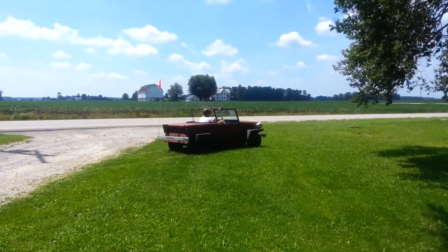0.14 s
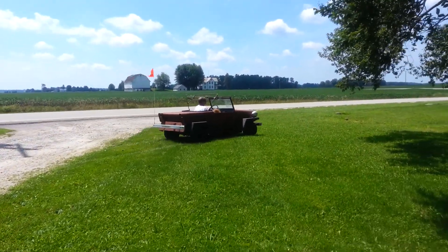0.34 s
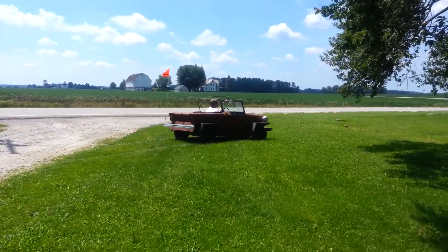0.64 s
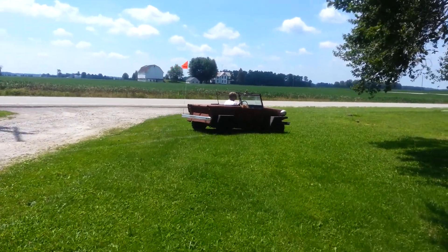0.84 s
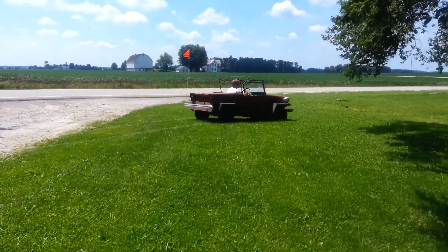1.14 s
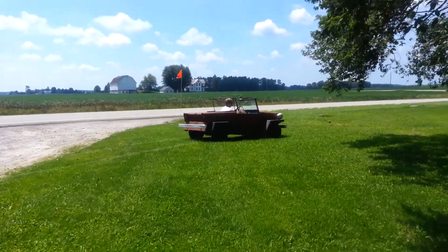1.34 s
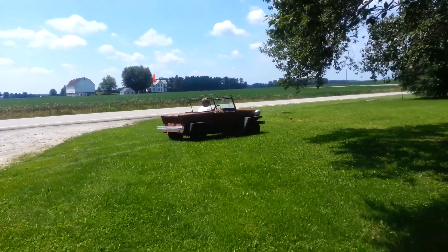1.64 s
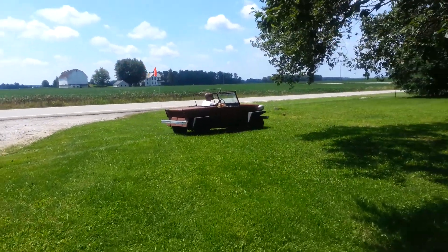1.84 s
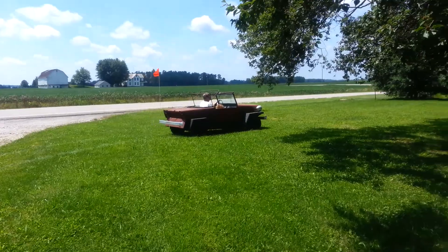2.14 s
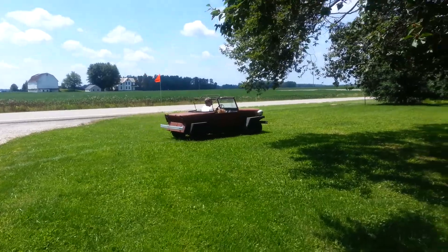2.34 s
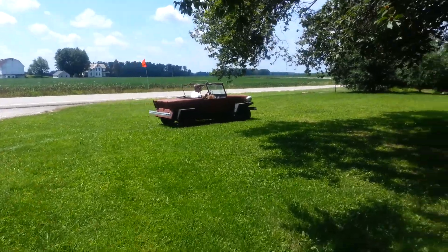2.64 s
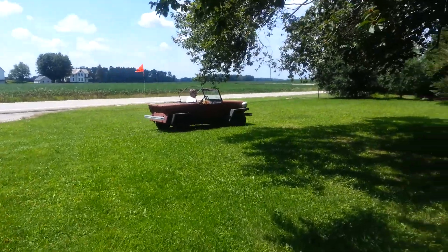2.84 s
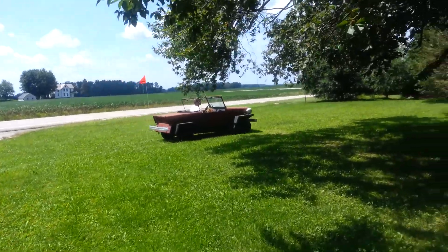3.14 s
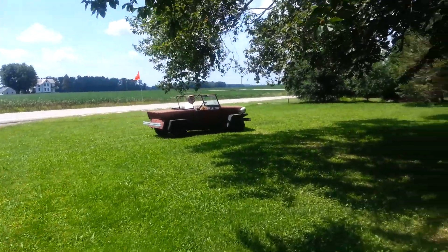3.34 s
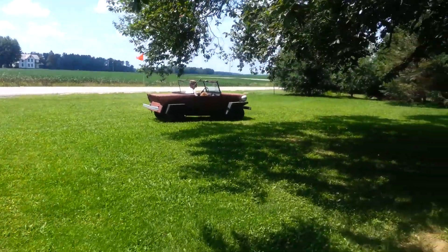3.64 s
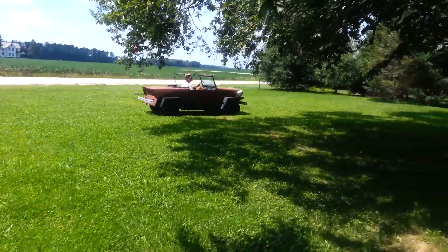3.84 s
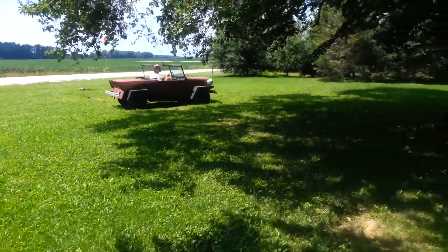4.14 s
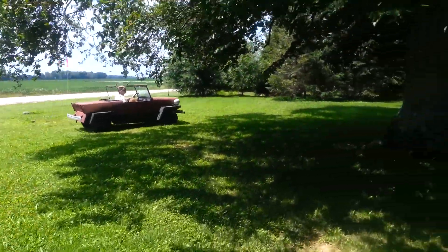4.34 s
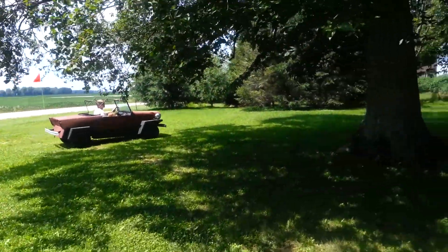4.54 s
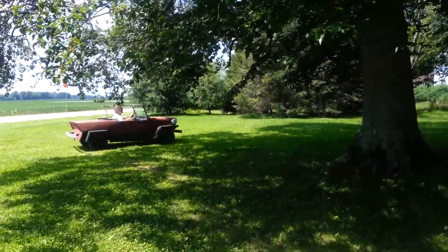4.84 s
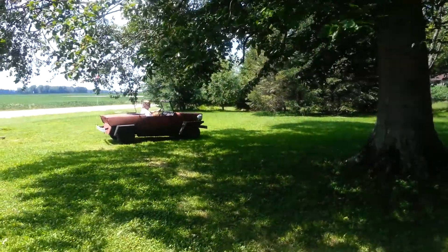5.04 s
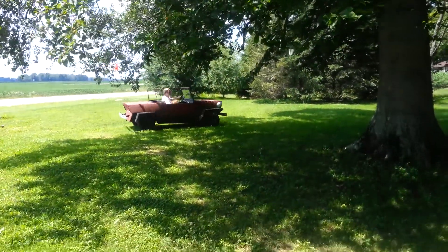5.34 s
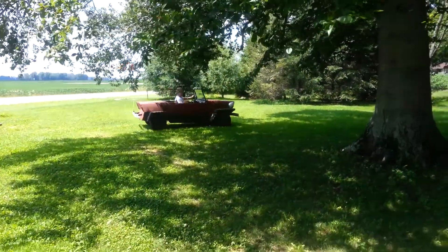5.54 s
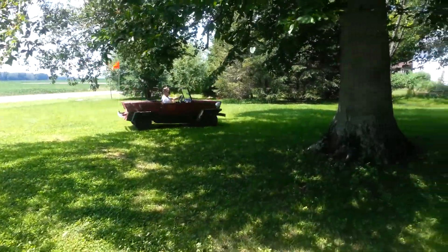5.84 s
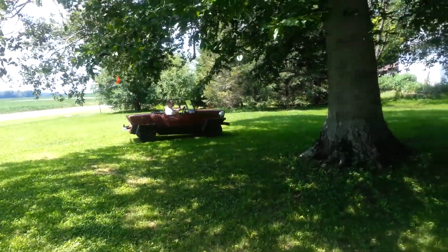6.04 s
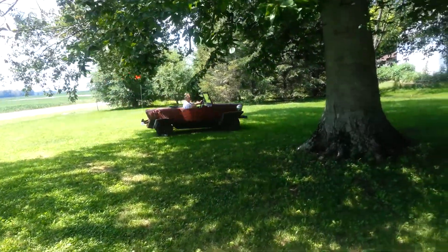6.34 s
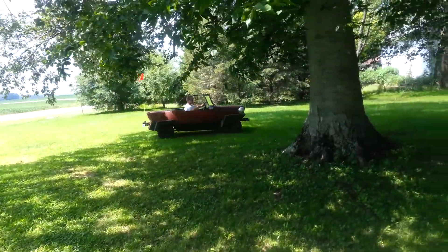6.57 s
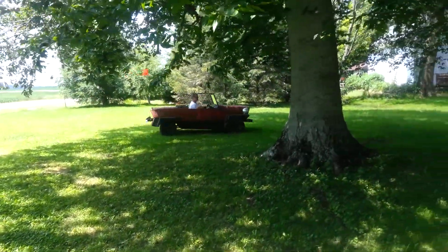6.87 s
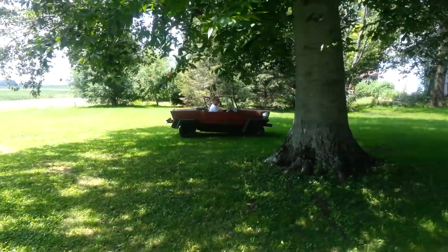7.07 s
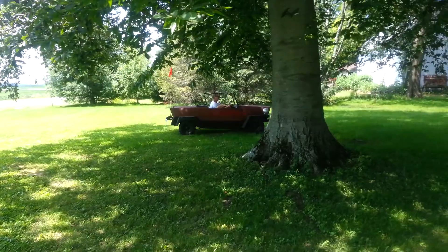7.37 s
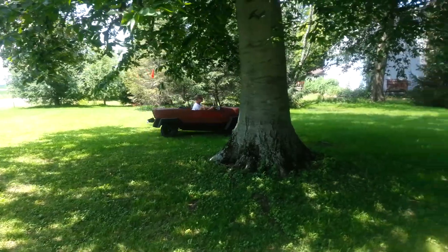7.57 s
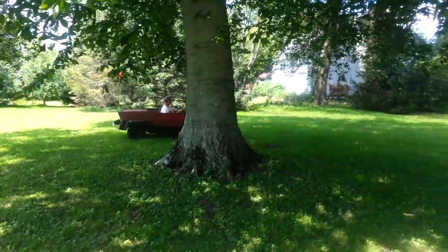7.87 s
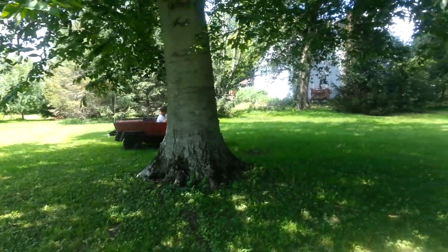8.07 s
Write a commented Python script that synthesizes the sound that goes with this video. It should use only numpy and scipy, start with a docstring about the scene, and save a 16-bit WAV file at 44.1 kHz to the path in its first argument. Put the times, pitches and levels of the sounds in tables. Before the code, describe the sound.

A small one-cylinder engine putts steadily, about thirteen low booming pops a second, as a little open car crosses a lawn outdoors.

```python
"""A one-cylinder four-stroke engine putts in a little car crossing a lawn, some ten metres from a phone.
Each firing booms in the exhaust until the valve shuts; its crests ring body panels and silencer.
Each boom shakes a loose metal part, a few bumps knock the chassis, and tyres rumble on the grass.
The tree line returns a faint echo; air and microphone hiss, two thin tones sound, the camera ticks."""
import sys
import numpy as np
from scipy import signal
from scipy.fft import rfft, irfft
from scipy.io import wavfile
from scipy.ndimage import uniform_filter1d

SR = 44100
rng = np.random.default_rng(int(sys.argv[2]) if len(sys.argv) > 2 else 0)


def wrap_up_sound(samples):
    """Save the sound to the file named by the first command line argument, as 16-bit audio."""
    columns = np.atleast_2d(samples).T
    # keep every value between -1 and 1, then stretch to whole-number steps
    tamed = np.clip(columns, -1, 1)
    steps = np.round(tamed * 32767).astype(np.int16)
    wavfile.write(sys.argv[1], SR, steps)


N = 361905


def undb(db):
    """Decibels to amplitude ratio."""
    return 10 ** (np.asarray(db) / 20)


def level(x, rms_db):
    """Scale a signal to an rms level."""
    return x * undb(rms_db) / np.sqrt(np.mean(x ** 2))


def band(x, hz, width_hz):
    """Two-pole resonance, gain 1 at the centre."""
    return signal.lfilter(*signal.iirpeak(hz, hz / width_hz, SR), x)


def noise():
    """White noise over the whole scene."""
    return rng.standard_normal(N)


def walk(rate_hz):
    """Random levels held 1 / rate_hz and slewed twice; spread about 0.5."""
    hold = int(SR / rate_hz)
    steps = np.repeat(rng.standard_normal(N // hold + 1), hold)
    slewed = uniform_filter1d(uniform_filter1d(steps, hold), hold)
    return 0.7 * slewed[:N]


def add(out, start_s, piece):
    """Mix a short sound in at its start time."""
    i = int(start_s * SR)
    lo, hi = max(i, 0), min(i + len(piece), N)
    if hi > lo:
        out[lo:hi] += piece[lo - i:hi - i]


# spectral shape of air, leaves and microphone: pitch_hz [Hz], density_db [dB per Hz, relative]
AIR_SHAPE = [(35, -22), (62, -1), (110, -4), (200, -2), (500, -26.5), (900, -11), (2000, -17), (3200, -17),
             (5800, -25), (8000, -22.5), (14300, -20.5)]
# thin steady tones: pitch_hz [Hz], rms_db [dB]
THIN_TONES = [(10201, -81), (13502, -85)]
AIR_RMS_DB = -52  # before the flicker


def air():
    """Smooth coloured hiss that flickers a little, and two thin tones."""
    shape_hz, density_db = np.transpose(AIR_SHAPE)
    bin_hz = np.maximum(np.arange(N // 2 + 1) * SR / N, 1)
    gain_db = np.interp(np.log(bin_hz), np.log(shape_hz), density_db)
    hiss = level(irfft(rfft(noise()) * undb(gain_db), N), AIR_RMS_DB)
    t = np.arange(N) / SR
    tones = sum(np.sqrt(2) * undb(rms_db) * np.sin(2 * np.pi * hz * t) for hz, rms_db in THIN_TONES)
    return hiss * undb(0.99 * walk(6)) + tones


# spells of ticking: middle_s [s], half_width_s [s], click_db [dB, before scatter and filtering]
TICK_SPELLS = [(.9, 0.58, -39), (1.83, 0.26, -36), (3.2, 0.35, -37), (5.5, 0.28, -36.5), (6.7, .35, -43)]
TICK_RATE_HZ, TICK_START_S, TICK_SCATTER_DB, TICK_WIDTH_S = 30, .030, 2.5, 0.00076


def ticks():
    """Camera ticks: tiny dull clicks on a strict clock, coming and going in patches."""
    at_s = np.arange(TICK_START_S, N / SR, 1 / TICK_RATE_HZ)
    scatter_db = TICK_SCATTER_DB * rng.standard_normal(len(at_s))
    swell = sum(undb(click_db) * np.exp(-((at_s - middle_s) / half_width_s) ** 2)
                for middle_s, half_width_s, click_db in TICK_SPELLS)
    clicks = np.zeros(N)
    clicks[(at_s * SR).astype(int)] = -undb(scatter_db) * swell
    # click width dulls the top
    dull = np.convolve(clicks, np.hanning(int(TICK_WIDTH_S * SR)), "same")
    return band(dull, 1150, 1200)


# chassis knocks: start_s [s], thud_db [dB peak], pitch_hz [Hz], crack_db [dB re thud]
BUMPS = [(1.687, -28, 232, -5), (3.04, -35, 230, -14), (4.943, -34, 227, -16), (5.017, -35, 230, -14)]


def bumps():
    """Chassis over bumps: a dull damped thud with a short broad crack on top."""
    out, age_s = np.zeros(N), np.arange(int(.06 * SR)) / SR
    for start_s, thud_db, pitch_hz, crack_db in BUMPS:
        swell = age_s / 0.0027 * np.exp(1 - age_s / 0.0029)
        thud = -np.sin(2 * np.pi * pitch_hz * age_s + 2) * swell
        grit = band(band(rng.standard_normal(len(age_s)), 750, 600), 750, 600)
        crack = band(grit * age_s * np.exp(-age_s / .002), 700, 500)
        add(out, start_s, undb(thud_db) * (thud + undb(crack_db) * crack / np.abs(crack).max()))
    return out


def tyres():
    """Tyres and springs over lumpy grass: uneven low noise, rms 1."""
    rumble = undb(2.16 * walk(20)) * band(band(noise(), 139, 133), 121, 295)
    return level(rumble, 0)


# engine speed, easing a little halfway: time_s [s], firing_rate_hz [firings per s]
SPEED = [(0, 13.1109), (4.3866, 13.1622), (5.7533, 12.9721), (8.21, 12.9826)]
FIRST_FIRING_S = .0202


def firings():
    """Integrate engine speed to a running firing count; return it and each firing time."""
    t = np.arange(N) / SR
    count = np.cumsum(np.interp(t, *np.transpose(SPEED))) / SR
    count += 1 - np.interp(FIRST_FIRING_S, t, count)
    at_s = np.interp(np.arange(1, count[-1]), count, t)
    # one firing before the start
    return count, np.r_[2 * at_s[0] - at_s[1], at_s]


# loudest rattles, replacing the one nearest in time: start_s [s], peak_db [dB], pitch_hz [Hz]
LOUD_RATTLES = [(0.0225, -43, 2800), (0.1767, -40, 2850), (0.4802, -39, 2900), (0.557, -41.5, 2840),
                (0.631, -45, 2820), (0.7852, -44.5, 2870), (1.0143, -44, 2920), (1.2415, -46, 2750),
                (2.2325, -45, 3180), (2.386, -45, 3020), (2.6886, -46, 3040), (2.766, -45.5, 3020),
                (2.9936, -40.5, 3100), (3.9065, -41.5, 3030), (4.4376, -46, 3060), (4.6646, -44, 3020)]
# the other, softer rattles
RATTLE_LAG_S, RATTLE_PITCH_HZ, RATTLE_SCATTER_HZ = .003, 2954, 169
RATTLE_PEAK_DB, RATTLE_SCATTER_DB, RATTLE_HIDDEN_DB = -49.5, 2, -21


def rattles(turn):
    """A loose metal part chatters some milliseconds as a boom starts; the body hides it in the turn."""
    out, age_s = np.zeros(N), np.arange(int(0.023 * SR)) / SR
    at_s = firings()[1][1:] + RATTLE_LAG_S
    chance = rng.standard_normal((len(at_s), 2)).T
    hidden_db = RATTLE_HIDDEN_DB * turn[(at_s * SR).astype(int)] ** 3
    soft_db = RATTLE_PEAK_DB + RATTLE_SCATTER_DB * chance[0] + hidden_db
    rows = np.transpose([at_s, soft_db, RATTLE_PITCH_HZ + RATTLE_SCATTER_HZ * chance[1]])
    for loud in LOUD_RATTLES:
        rows[np.abs(at_s - loud[0]).argmin()] = loud
    for start_s, peak_db, pitch_hz in rows:
        grit = rng.standard_normal(len(age_s)) * np.exp(-age_s / 0.0051)
        chatter = band(band(grit, pitch_hz, 280), pitch_hz, 410)
        add(out, start_s, undb(peak_db) * chatter / np.abs(chatter).max())
    return out


PIPE_SHUT_HZ, HOT_GAS_HZ, HOT_GAS_S = 161.5, 221, .0013
VALVE_DROP_HZ, VALVE_OPEN_S, SHUT_S = 64, .027, .0232
# from the flank: heard longer, higher, and fading with age
FLANK_LONGER_S, FLANK_HIGHER_HZ, FLANK_FADE_DB_PER_S = .0022, 8, -160


def boom(turn):
    """Phase, age and envelope of the exhaust resonance, counted from the latest firing."""
    count, at_s = firings()
    firing = count.astype(int)
    age_s = np.maximum(np.arange(N) / SR - at_s[firing], 0)
    chance = rng.standard_normal((firing[-1] + 1, 3))[firing].T
    # hot gas raises the pitch at first
    hot_cycles = HOT_GAS_HZ * HOT_GAS_S * (1 - np.exp(-age_s / HOT_GAS_S))
    # the open cylinder lengthens the pipe and lowers it; valve lift integrated over time
    open_s = np.minimum(age_s, VALVE_OPEN_S)
    lift_s = open_s / 2 - VALVE_OPEN_S * np.sin(2 * np.pi * open_s / VALVE_OPEN_S) / (4 * np.pi)
    cycles = PIPE_SHUT_HZ * age_s + hot_cycles - VALVE_DROP_HZ * lift_s
    cycles += FLANK_HIGHER_HZ * turn * age_s
    phase = 2 * np.pi * cycles * (1 + .003 * chance[0])
    # the valve shuts the boom off
    end_s = SHUT_S + FLANK_LONGER_S * turn + .0004 * chance[1]
    shut = 1 / (1 + np.exp((age_s - end_s) / .0011))
    shut *= undb(.5 * chance[2] + FLANK_FADE_DB_PER_S * turn * age_s)
    return phase, age_s, shut


# boom-shaken panels: pitch_hz [Hz], width_hz [Hz], behind_db [dB rms re boom], flank_db [dB rms re boom]
PANELS = [(184.7, 3.4, -33.5, -34), (209.7, 2.7, -55, -39), (227.4, 18, -49, -24), (274, 39, -35, -30.5),
          (313.5, 27, -35.5, -39), (408, 88, -33, -44.5), (524, 130, -51, -38.5), (688.6, 14.3, -36, -47.5),
          (928, 110, -45.5, -43.5), (1257, 36, -45.5, -57.5)]
SILENCER_HZ, SILENCER_WIDTH_HZ = 610, 50


def engine(turn, ring_db):
    """The boom, its steep crests in panels, silencer and tin, tail pipe gas and cooling air."""
    phase, age_s, shut = boom(turn)
    push = (1 - np.exp(-age_s / .0031)) * shut
    wave = -push * (np.sin(phase) + .07 * turn * np.cos(2 * phase))
    # crests steepen into short jolts, the first ones hardest
    smooth = shut * np.exp(-age_s / 0.021) * np.exp(30 * (-np.sin(phase) - 1))
    # turbulence makes them uneven in the upper range
    turbulence = level(band(band(noise(), 750, 700), 750, 900), -11)
    jolts = smooth * (1 + turbulence)
    panels = np.zeros(N)
    for pitch_hz, width_hz, behind_db, flank_db in PANELS:
        drive = smooth if pitch_hz < 350 else jolts
        panel = level(band(band(drive, pitch_hz, width_hz), pitch_hz, pitch_hz / 2), 0)
        panels += panel * undb(behind_db + (flank_db - behind_db) * turn)
    ring = level(band(band(jolts, SILENCER_HZ, SILENCER_WIDTH_HZ), SILENCER_HZ, 96), 0)
    # gas at the tail pipe
    puff = level(push * band(noise(), 530, 1230), -47)
    hiss = level(push * band(noise(), 7900, 9000), -52)
    # faint chatter of tin on every jolt, hidden as the car turns its flank
    chatter = band(band(noise(), 2500, 610), 2850, 860)
    tin = jolts * undb(4.7 * walk(13) - 11.4 * turn) * chatter
    tin = level(band(tin, 2950, 440), -50)
    # cooling air hisses past the fins on the flank
    fins = turn * undb(2 * walk(8)) * band(band(noise(), 2580, 250), 2600, 400)
    return wave + panels + undb(ring_db) * ring + puff + hiss + tin + level(fins, -54)


# drive across the lawn: time_s [s], boom_db [dB peak],
# turn [0 tail pipe faces the phone, 1 flank does], ring_db [silencer ring, dB rms re boom]
DRIVE = [(0, -20.5, 0.0078, -39), (1.7, -21, 0, -36.5), (2.8, -20.5, 0.085, -42), (3.5, -19, 0.35, -41),
         (4.1, -19, .54, -34.5), (4.7, -18, 0.68, -39), (5.3, -19.5, 0.77, -30.5),
         (6.9, -18.5, 0.91, -33.5), (8.21, -19.5, 0.97, -30)]
RUMBLE_BEHIND_DB, RUMBLE_FLANK_DB = -22.5, -24.5  # re boom
ECHO_S, ECHO_DB = .026, -25.5


def scene():
    """The car on the lawn with its tree-line echo, the small noises and the air."""
    time_s, *columns = np.transpose(DRIVE)
    boom_db, turn, ring_db = (np.interp(np.arange(N) / SR, time_s, column) for column in columns)
    turn = np.clip(turn, 0, 1)
    rumble_db = RUMBLE_BEHIND_DB + (RUMBLE_FLANK_DB - RUMBLE_BEHIND_DB) * turn
    car = undb(boom_db) * (engine(turn, ring_db) + undb(rumble_db) * tyres())
    # the tree line sends the car back a little later
    lag = int(ECHO_S * SR)
    car[lag:] += undb(ECHO_DB) * car[:-lag]
    return (car + rattles(turn) + bumps() + ticks() + air())[None]


BASS_CUT_HZ, TOP_HZ = 47, 14450


def record(dry):
    """The phone drops the deep bass and cuts the top steeply."""
    bass_cut = signal.butter(4, BASS_CUT_HZ, "high", fs=SR, output="sos")
    top_cut = signal.ellip(14, .2, 80, TOP_HZ, fs=SR, output="sos")
    return signal.sosfilt(top_cut, signal.sosfiltfilt(bass_cut, dry))


dry = scene()
out = record(dry)
wrap_up_sound(out)
```